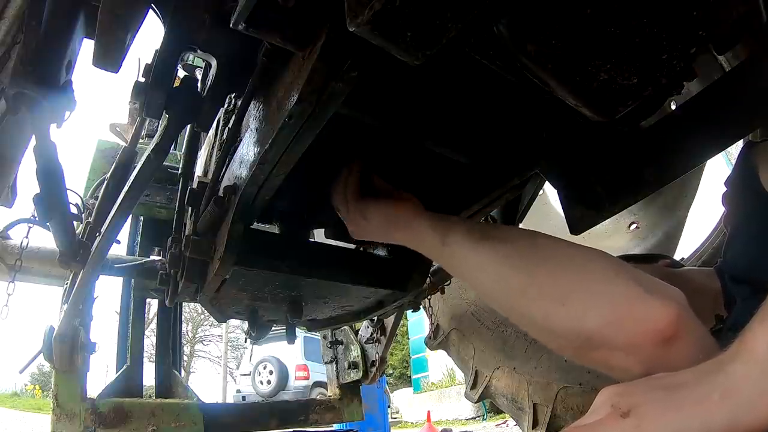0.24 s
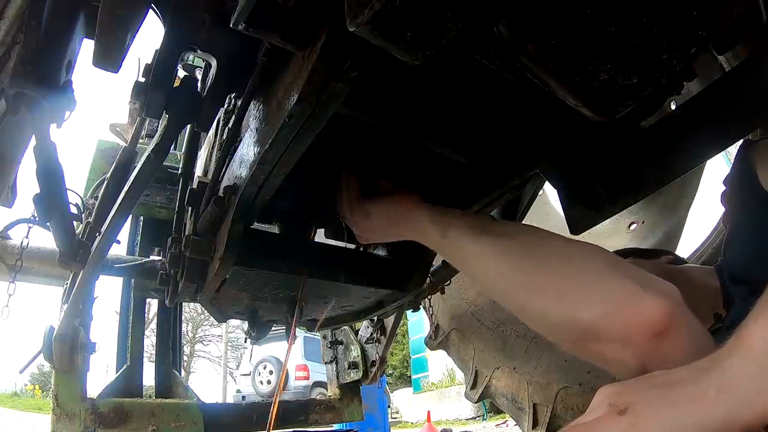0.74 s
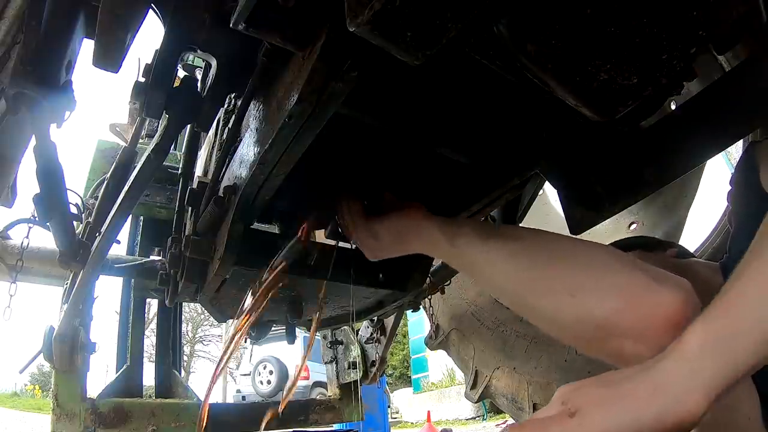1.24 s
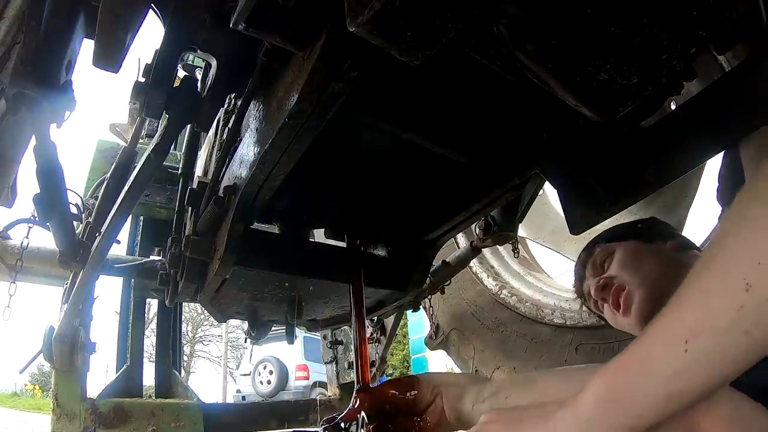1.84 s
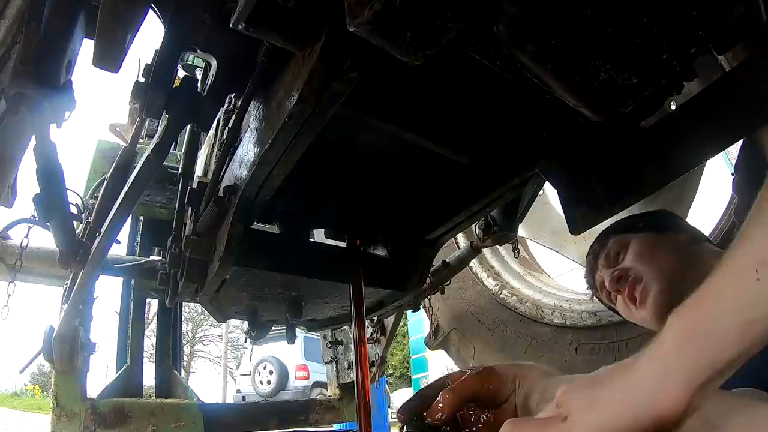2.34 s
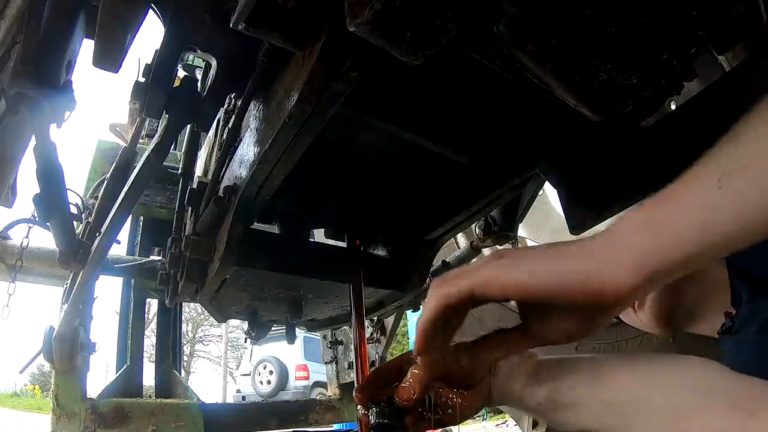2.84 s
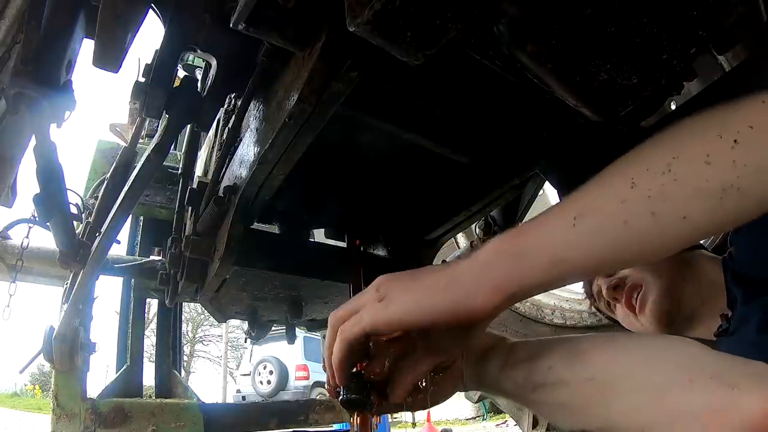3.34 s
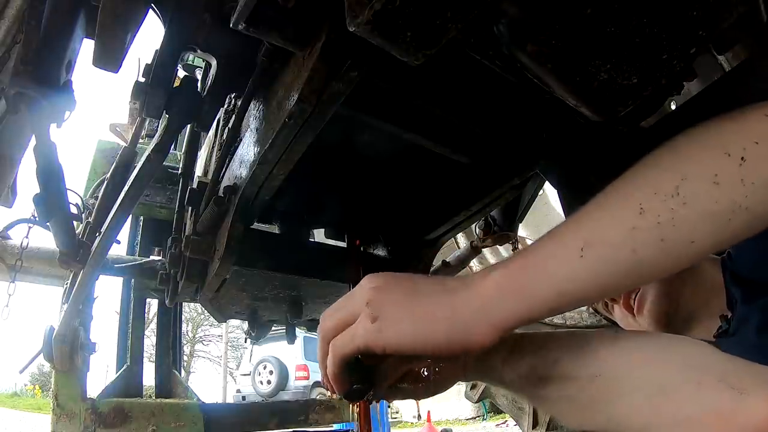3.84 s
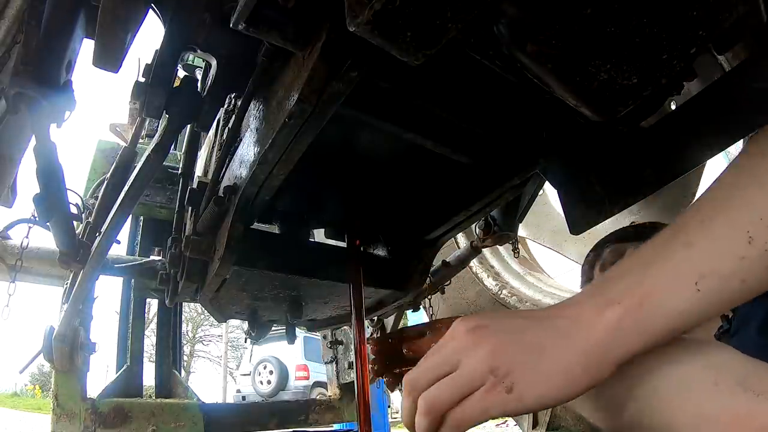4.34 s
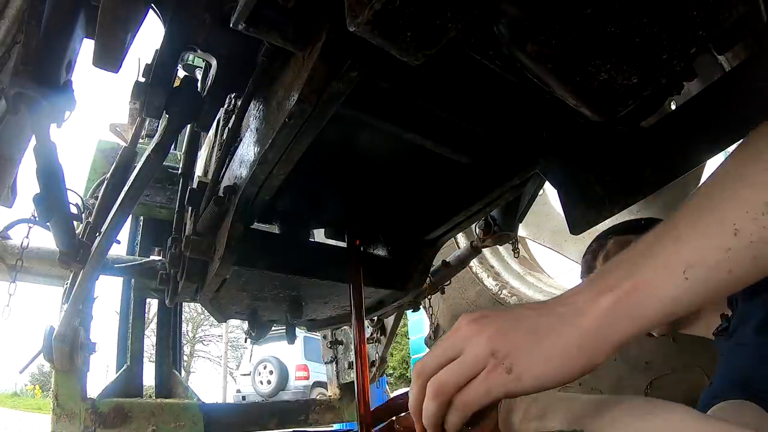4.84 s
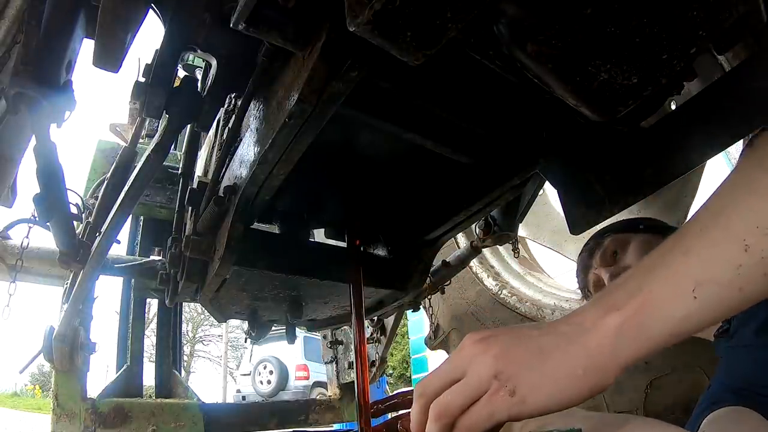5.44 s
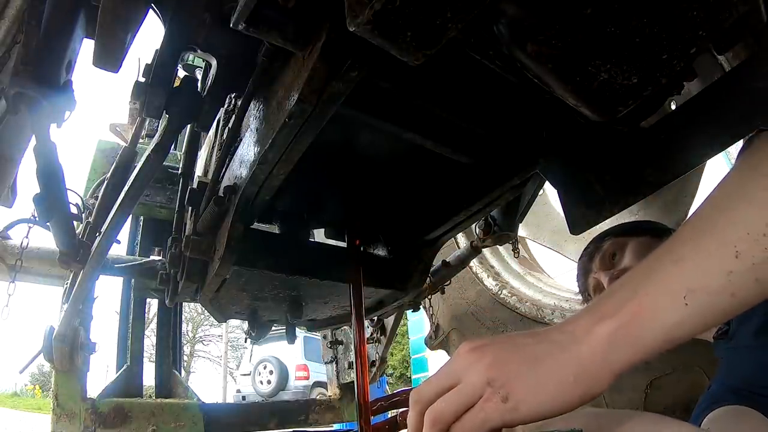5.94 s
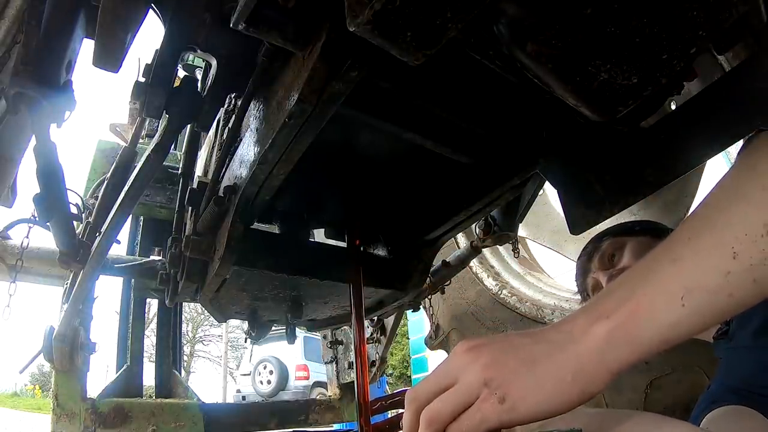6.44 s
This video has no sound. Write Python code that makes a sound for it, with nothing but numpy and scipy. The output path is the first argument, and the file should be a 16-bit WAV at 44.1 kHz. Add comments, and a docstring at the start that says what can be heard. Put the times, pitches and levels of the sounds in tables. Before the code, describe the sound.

A plug clicks loose and oil gushes into a plastic pan, splattering and gurgling, then settles to faint wet ticks.

```python
"""Draining oil into a plastic pan

Under a parked machine a drain plug clicks loose. Oil spurts past the fingers, slaps into the pan
and drums on it in surges, while trapped air gurgles. Then small wet ticks are left, over a faint rushing
that swells and fades. The pan is bumped a few times; the underbody adds a short echo in the open air."""
import sys
import numpy as np
from scipy import signal
from scipy.fft import rfft, irfft
from scipy.io import wavfile
from scipy.ndimage import uniform_filter1d

SR = 44100
rng = np.random.default_rng(int(sys.argv[2]) if len(sys.argv) > 2 else 0)


def waveform_to_disk(signal):
    """Save audio, clipped to [-1, 1], as 16-bit WAV at the path in sys.argv[1]."""
    frames = np.transpose(np.atleast_2d(signal))
    scaled = np.clip(frames, -1, 1) * 32767
    samples = np.round(scaled).astype(np.int16)
    wavfile.write(sys.argv[1], SR, samples)


N = 295029
TIME = np.arange(N) / SR  # clock for the whole scene, in seconds
HIT_TIME = np.arange(SR // 3) / SR  # clock for one short sound
TOP_HZ = 13650  # treble limit


# tone of droplets landing: pitch_hz, gain_db
SPATTER_TONE = [(500, -24), (950, 9), (1300, 8.5), (2000, 3.5), (2700, 6), (3400, -2), (4500, -10.5),
                (6500, -17), (13000, -30.5)]
# oil hits the hand and turns to mist: start_s, length_s, level_db
HAND_SPRAYS = [(0.699, 0.023, -53), (0.763, 0.014, -60), (1.278, 0.011, -51), (1.412, 0.036, -49.5),
               (1.473, 0.005, -48), (1.53, 0.12, -54.5), (1.68, 0.028, -47.5), (2.03, 0.041, -47.5),
               (2.078, 0.025, -41.5), (4.89, 0.51, -76)]
# surges of the jet (spatter is relative to the drumming, whose treble ends at the cutoff):
# start_s, crest_s, start_db, crest_db, fall_db_per_s, spatter_db, cutoff_hz
SURGES = [(1.026, 1.314, -36.5, -34.5, 197, -7, 1720), (1.329, 1.42, -33, -29, 118, -13.5, 1730),
          (1.505, 1.611, -34.5, -29.5, 147, -8, 1370), (1.812, 1.94, -37.5, -36.5, 121, -11.5, 700),
          (1.98, 2.192, -37, -32.5, 189, -4, 1680), (2.378, 2.408, -43, -36, 123, -9, 1570)]
def gush(mist_db=-24, droplets_db=-2):
    """The broken jet drums on the pan and throws off droplets and fine mist."""
    lumps = gain(wander(per_s=49))
    drumming = steady(sum(pan_bottom(drops(per_s=260, spread_db=2)) for spot in range(3)))
    drum = wetness = 0
    for *shape, spatter_db, cutoff_hz in SURGES:
        force = surge(*shape) * lumps
        drum += force * dull(drumming, cutoff_hz, order=3)
        wetness += force * gain(spatter_db)
    mist = wetness * gain(mist_db) + bursts(HAND_SPRAYS, attack_s=0.005, release_s=0.0067)
    mist *= gain(3 * wander(per_s=28))
    droplets = gain(droplets_db) * shower(SPATTER_TONE, per_s=980, spread_db=1.5)
    return drum + wetness * (droplets + spits()) + mist * spray()


def surge(start_s, crest_s, start_db, crest_db, fall_db_per_s, rise_db_per_s=480):
    """The force of one surge rises quickly, builds slowly and collapses."""
    build_db = np.interp(TIME, [start_s, crest_s], [start_db, crest_db])
    rise_db = rise_db_per_s * np.maximum(start_s - TIME, 0)
    fall_db = fall_db_per_s * np.maximum(TIME - crest_s, 0)
    return gain(build_db - rise_db - fall_db)


# tone of a dead thud on the pan: pitch_hz, gain_db
THUD_TONE = [(60, -16), (140, -21.5), (215, -12.5), (300, -2.5), (600, 3), (800, -4.5), (1050, 0.5),
             (1400, -18.5), (2200, -32), (5000, -41)]
# notes the pan's oily bottom rings with: pitch_hz, level_db, ring_s
BOTTOM_NOTES = [(284, -12, 0.47), (396, 0, 0.089), (491, 5, 0.1), (520, -10, 0.092), (639, 4.5, 0.23),
                (674, 11.5, 0.064), (854, -6.5, 0.32), (966, 7, 0.089), (970, -5, 0.023),
                (1173, -0.5, 0.19)]
def pan_bottom(force, ring_db=0):
    """Each hit gives a thud and rings the bottom, which the oil soon quiets."""
    thud = colour(force, THUD_TONE)
    ring = band(through(force, ringing(BOTTOM_NOTES)), 220, 1700)
    return unit(thud) + gain(ring_db) * unit(ring)


# blobs of oil landing (spatter is relative to the thud): start_s, peak_db, pitch_hz, spatter_db
SLAPS = [(0.687, -36, 890, -3), (0.699, -27, 632, -3.5), (0.707, -23.5, 429, -9.5),
         (0.762, -35.5, 371, -15), (0.982, -39.5, 635, -11), (1.021, -26, 708, -11), (1.063, -25, 980, -13),
         (1.091, -21.5, 665, -9.5), (1.153, -26, 684, -25), (1.245, -20.5, 680, -7),
         (1.291, -25.5, 336, -10), (1.378, -28, 666, -23), (1.474, -19.5, 970, -19), (1.512, -24, 600, -11),
         (1.562, -20, 517, -15), (1.575, -21, 990, -4), (1.593, -17, 564, -9.5), (1.606, -19, 557, -7.5),
         (1.668, -26, 663, -5), (1.770, -29.5, 586, -28), (1.824, -36, 497, -9), (1.868, -33, 563, -20),
         (1.974, -26, 697, -14), (2.015, -27, 970, -12), (2.077, -23, 1135, -0.5), (2.128, -24, 860, -11),
         (2.173, -21.5, 864, -17), (2.232, -25, 646, -1), (2.398, -27.5, 460, -11.5),
         (2.479, -36, 550, -4.5)]
def slaps(flatten_s=0.0024, sharpness=5):
    """Each blob flattens on the pan, punches a briefly ringing hollow in the pool and spatters."""
    out = np.zeros(N)
    for start_s, peak_db, pitch_hz, spatter_db in SLAPS:
        thud = pan_bottom(splash(ring_s=0.049, attack_s=flatten_s), ring_db=1.5)
        add(out, start_s, peak(thud, peak_db))
        hollow = resonate(splash(ring_s=0.073, attack_s=flatten_s), pitch_hz, sharpness)
        add(out, start_s, peak(resonate(hollow, pitch_hz, sharpness), peak_db - 3))
        spatter = colour(splash(ring_s=0.059, attack_s=flatten_s), SPATTER_TONE)
        add(out, start_s, peak(underbody(spatter), peak_db + spatter_db))
    return out


# tone of a splat: pitch_hz, gain_db
SPLAT_TONE = [(500, -1), (1500, -13.5), (2600, -3.5), (5000, -10.5), (8000, -17), (13000, -11)]
# blobs that burst: start_s, peak_db, cutoff_hz
SPLATS = [(1.219, -42, 4000), (1.3176, -35, 6000), (1.3814, -33, 3470), (1.4064, -35, 7000),
          (1.4704, -27.5, 9980), (1.6049, -24, 4500), (1.7153, -25, 5900), (1.7194, -29, 8000),
          (1.7696, -26, 6200), (1.822, -26.5, 4480), (1.8682, -28.5, 3760), (2.0325, -31, 5000),
          (2.0762, -21.5, 6900), (2.314, -33, 7500), (2.4056, -40, 5050), (2.639, -34, 4000)]
def splats():
    """A blob bursts flat with a sharp, wet crack."""
    out = np.zeros(N)
    for start_s, peak_db, cutoff_hz in SPLATS:
        burst = colour(splash(ring_s=0.027, attack_s=0.001), SPLAT_TONE)
        crack = dull(burst, cutoff_hz, order=3)
        add(out, start_s, peak(underbody(crack, early_db=1, late_db=-6.5), peak_db))
    return out


# gurgles in the pool: start_s, length_s, level_db, pitch_hz
GURGLES = [(1.021, 0.16, -42, 670), (1.313, 0.11, -39, 303), (2.12, 0.09, -31, 920),
           (2.157, 0.1, -35.5, 467), (2.385, 0.12, -48, 327)]
def gurgles(per_s=260, pitch_spread=0.12):
    """The jet drags air into the pool as clouds of bubbles, each with its own pitch."""
    out = np.zeros(N)
    for start_s, length_s, level_db, pitch_hz in GURGLES:
        cloud = np.zeros(N)
        for k, (delay, pitch) in enumerate(rng.random((int(length_s * per_s), 2))):
            bubble_hz = pitch_hz * (1 + pitch_spread * (2 * pitch - 1))
            add(cloud, start_s + (k + delay) / per_s, bubble(bubble_hz, cycles=26))
        out += gain(level_db) * cloud / np.sqrt(np.sum(cloud ** 2) / (length_s * SR))
    return out


def spits(level_db=-6, low_hz=1450, octaves=1.32, count=170):
    """Drops thrown off the jet trap tiny bubbles that spit one by one."""
    out = np.zeros(N)
    start_s, end_s = SURGES[0][0], SWELLS[0][0]
    length_s = end_s - start_s
    for when, pitch, chance in rng.random((count, 3)):
        size_db = -5 * np.log(max(chance, 0.04))  # many small, a few large
        spit = bubble(low_hz * 2 ** (octaves * pitch), cycles=10, glide=0.062)
        add(out, start_s + when * length_s, gain(size_db) * spit)
    echoed = underbody(out, early_db=-1, late_db=-9)
    return gain(level_db) * unit(echoed) * np.sqrt(length_s * SR / N)


# tone of fine mist: pitch_hz, gain_db
SPRAY_TONE = [(1500, -6.5), (4000, 4.5), (6000, -1), (8000, -7), (11000, -6.5), (13500, -17)]
def spray(flicker_db=4):
    """Fine droplets keep shifting in size, and so in brightness."""
    mist = shower(SPRAY_TONE, per_s=710, spread_db=2.5)
    edges_hz = np.geomspace(2000, TOP_HZ, 6)
    return steady(sum(band(mist, low_hz, high_hz) * gain(flicker_db * wander(per_s=26))
                      for low_hz, high_hz in zip(edges_hz, edges_hz[1:])))


# the clearest wet ticks: start_s, gain_db, pitch_hz
TICKS = [(0.761, -33, 1900), (0.823, -44, 1720), (0.892, -50, 2210), (0.926, -49, 2390),
         (2.736, -46.5, 2350), (3.015, -48.5, 2650), (3.2984, -51.5, 2670), (3.327, -49, 3400),
         (3.335, -41, 2540), (3.479, -50, 3100), (3.511, -56, 5570), (3.67, -50, 2630), (4.687, -54, 2580),
         (4.9462, -49.5, 4660), (5.022, -52.5, 3920), (5.175, -51.5, 2900), (5.215, -55.5, 4330),
         (5.279, -50.5, 3680), (5.3426, -53, 2800), (5.645, -57, 2800), (5.843, -52.5, 3050),
         (6.0658, -54.5, 2730), (6.2738, -52.5, 3740), (6.46, -55, 2530), (6.621, -56.5, 2940)]
def ticks():
    """Single drops and bursting bubbles stand out from the rest."""
    out = np.zeros(N)
    for start_s, gain_db, pitch_hz in TICKS:
        add(out, start_s, gain(gain_db) * snap(pitch_hz))
    return out


def snap(pitch_hz):
    """A film of oil snaps with a very short note and a bright edge."""
    click = underbody(splash(ring_s=0.009, attack_s=0.0008), early_db=0, late_db=-9)
    note = dull(resonate(click, pitch_hz, sharpness=2.8), cutoff_hz=4000)
    return peak(note, db=4) + peak(colour(click, SPRAY_TONE), db=-13)


# single bubbles: start_s, pitch_hz, peak_db
BUBBLES = [(1.847, 3800, -39), (2.972, 295, -49), (3.392, 3540, -54.5), (3.569, 1086, -44.5),
           (3.572, 1245, -47)]
def bubbles():
    """A few bubbles are large enough to ring out alone."""
    out = np.zeros(N)
    for start_s, pitch_hz, peak_db in BUBBLES:
        add(out, start_s, peak(underbody(bubble(pitch_hz, cycles=30, glide=0.077)), peak_db))
    return out


def bubble(pitch_hz, cycles, glide=0.074):
    """Trapped air rings and rises in pitch as it surfaces."""
    decay = fade(cycles / pitch_hz)
    rising_hz = pitch_hz * (1 + glide * (1 - decay))
    return decay * np.sin(2 * np.pi * np.cumsum(rising_hz) / SR)


# notes the pan's wall rings with: pitch_hz, level_db, ring_s
WALL_NOTES = [(141, 5, 0.27), (169.3, 3.5, 0.16), (199, 2.5, 0.1), (420, 6, 0.12), (459, 4.5, 0.14),
              (590, 8.5, 0.09), (763, -1.5, 0.11), (840, -3, 0.19), (976, 5.5, 0.11), (1121, 10.5, 0.062),
              (1417, -2, 0.2)]
# tone of a hard knock: pitch_hz, gain_db
CRACK_TONE = [(400, -3), (1500, 11.5), (3000, 0), (6000, -10), (13000, -33)]
# bumps and heavy blobs that shake the wall: start_s, peak_db, contact_ms
BUMPS = [(0.717, -45, 3.7), (0.767, -43, 0.86), (1.648, -29.5, 1.2), (1.842, -35.5, 1.2), (2.227, -43, 2.3),
         (2.358, -37.5, 1.4), (3.953, -45, 4.5), (5.904, -30.5, 0.99)]
def bumps(rattle_db=-13, crack_db=3, crack_db_per_ms=-8):
    """A long, soft push wakes only the wall's low notes; a short one wakes them all and cracks."""
    out = np.zeros(N)
    bass_cut = signal.butter(2, 110, "high", fs=SR, output="sos")
    for start_s, peak_db, contact_ms in BUMPS:
        push = HIT_TIME * np.exp(-2 * np.pi * HIT_TIME / (contact_ms / 1000))
        wall = unit(ringing(WALL_NOTES, build_cycles=0.64))
        rattle = gain(rattle_db) * unit(fading_noise(ring_s=0.064))
        thump = signal.sosfilt(bass_cut, through(wall + rattle, push))
        add(out, start_s, peak(thump, peak_db))
        crack = underbody(colour(splash(ring_s=0.04, attack_s=0.0041), CRACK_TONE))
        add(out, start_s, peak(crack, peak_db + crack_db + crack_db_per_ms * contact_ms))
    return out


# tone of a click in the plug's thread: pitch_hz, gain_db
PLUG_TONE = [(300, -1.5), (1000, 6.5), (2200, -4), (3800, -11.5), (5500, -42), (13000, -50)]
# clicks of the loose plug: start_s, peak_db
PLUG_CLICKS = [(0.216, -35), (0.508, -33.5)]
def plug():
    """The last turns of the thread click dully into the casing."""
    out = np.zeros(N)
    for start_s, peak_db in PLUG_CLICKS:
        click = colour(splash(ring_s=0.003), PLUG_TONE)
        add(out, start_s, peak(underbody(click, early_s=0.081, late_db=-4), peak_db))
    return out


# tone of a squelch: pitch_hz, gain_db
SQUELCH_TONE = [(300, 9), (1200, 7), (2800, 1), (5000, -8.5), (7500, -11), (13000, -25)]
# oily fingers on the plug: start_s, length_s, level_db
SQUELCHES = [(3.02, 0.077, -61.5), (3.31, 0.039, -61.5), (3.73, 0.1, -68), (3.943, 0.021, -54.5),
             (5.03, 0.27, -67.5), (5.8, 0.22, -64)]
def squelches(flutter_db=2):
    """Oil squeezed between the fingers crackles in uneven spurts."""
    crackle = shower(SQUELCH_TONE, per_s=950, spread_db=7.5)
    squeezes = bursts(SQUELCHES, attack_s=0.0091, release_s=0.0072)
    return crackle * squeezes * gain(flutter_db * wander(per_s=23))


# tones of the soft rushing and of the crackle: pitch_hz, gain_db
RUSH_TONE = [(100, -25.5), (300, 3), (550, 5.5), (1000, 5), (1380, 4), (1850, -13.5), (4000, -43.5)]
CRACKLE_TONE = [(900, -15), (2000, 2), (2900, -4.5), (5000, -8.5), (7500, -16), (13000, -24)]
# how the rushing swells and fades: time_s, level_db
SWELLS = [(2.55, -54.5), (2.72, -59.5), (2.88, -72.5), (3.03, -59.5), (3.22, -61.5), (3.42, -66.5),
          (3.87, -59.5), (4.02, -63.5), (4.12, -96), (4.32, -64), (4.6, -63), (4.8, -69), (4.92, -64),
          (5.15, -63), (5.52, -68), (5.8, -61.5), (6.15, -69), (6.6, -64.5)]
def rushing(crackle_db=-12, flutter_db=5.5, pops_from_s=2.7, low_pop_hz=2200, pop_count=80):
    """A faint, soft, fairly low rushing swells and fades about every 0.7 s, with crackle and tiny pops."""
    fade_in = np.interp(TIME, [2.45, 2.6], [0, 1])
    swell = gain(np.interp(TIME, *np.transpose(SWELLS)))
    rush = shower(RUSH_TONE, per_s=1500, spread_db=5.5)
    crackle = shower(CRACKLE_TONE, per_s=770, spread_db=1.5)
    pops = np.zeros(N)
    for when, pitch, size in rng.random((pop_count, 3)):
        start_s = pops_from_s + when * (TIME[-1] - pops_from_s)
        add(pops, start_s, gain(-63.5 + 8 * size) * snap(low_pop_hz * 2 ** pitch))
    pops *= np.minimum(2 * swell / np.median(swell), 1)  # quieter between swells
    crackle *= gain(crackle_db + flutter_db * wander(per_s=63))
    return fade_in * swell * (rush + crackle) + pops


def underbody(sound, early_db=2, early_s=0.059, late_db=-5, late_s=0.21):
    """The ground and the machine's underside throw back close echoes and a short tail."""
    early, late = (fading_noise(ring_s) * (HIT_TIME > 0.0006) for ring_s in (early_s, late_s))
    echoes = gain(early_db) * early / np.linalg.norm(early) + gain(late_db) * late / np.linalg.norm(late)
    echoes[0] = 1  # the direct sound
    return through(sound, echoes)


# tone of the outdoor air: pitch_hz, gain_db
AIR_TONE = [(12, -29), (20, -8), (75, -1), (102, 0), (249, -9), (451, -9.5), (517, -15.5), (592, -12),
            (889, -16.5), (1020, -15), (1800, -25), (2420, -25.5), (6090, -37), (13000, -39.5)]
def outdoors(air_db=-59, sway_db=0.84, breeze_db=-66, gust_db=3):
    """Faint far-off noise, and a light breeze that rumbles under it."""
    air = unit(colour(rng.standard_normal(N), AIR_TONE)) * gain(air_db + sway_db * wander(per_s=3.05))
    breeze_tone = [(10, -29), (35, 1), (90, 8), (200, -19.5), (1000, -51)]  # pitch_hz, gain_db
    breeze = unit(colour(rng.standard_normal(N), breeze_tone))
    return air + breeze * gain(breeze_db + gust_db * wander(per_s=15))


def splash(ring_s, attack_s=0.0001):
    """A quickly fading spatter of tiny hits; cubing the noise makes it spiky."""
    return rng.standard_normal(len(HIT_TIME)) ** 3 * fade(ring_s) * np.minimum(HIT_TIME / attack_s, 1)


def shower(tone, per_s, spread_db, spots=5):
    """Many tiny hits on several spots, each with its own echoes, blend into a steady noise."""
    return steady(sum(underbody(colour(drops(per_s / spots, spread_db), tone)) for _ in range(spots)))


def drops(per_s, spread_db):
    """Random hits, many small and a few large."""
    sizes = gain(spread_db * np.minimum(rng.exponential(size=N), 4))
    return (rng.random(N) < per_s / SR) * sizes * rng.choice([-1, 1], N)


def ringing(notes, build_cycles=0.044):
    """A body is struck at a random spot; each of its notes builds up, then fades."""
    return sum(gain(level_db) * fade(ring_s) * -np.expm1(-pitch_hz * HIT_TIME / build_cycles)
               * np.sin(2 * np.pi * (pitch_hz * HIT_TIME + rng.random()))
               for pitch_hz, level_db, ring_s in notes)


def bursts(table, attack_s, release_s):
    """A volume that rises, holds and dies away for each row."""
    return sum(gain(level_db) * np.clip((TIME - start_s) / attack_s + 1, 0, 1)
               * np.exp(-np.maximum(TIME - start_s - length_s, 0) / release_s)
               for start_s, length_s, level_db in table)


def wander(per_s):
    """A random drift, mostly between -1 and 1."""
    points = rng.standard_normal(1024)
    return np.interp(TIME * per_s, np.arange(len(points)), points)


def fade(ring_s):
    """Die away by 60 dB in ring_s seconds."""
    return np.exp(-np.log(1000) * HIT_TIME / ring_s)


def fading_noise(ring_s):
    """A puff of hiss that dies away."""
    return rng.standard_normal(len(HIT_TIME)) * fade(ring_s)


def colour(sound, tone, size=4096):
    """Make each pitch louder or softer, following a tone table."""
    pitch_hz, gain_db = np.transpose(tone)
    grid_hz = np.maximum(np.fft.rfftfreq(size, 1 / SR), 1)
    curve = gain(np.interp(np.log(grid_hz), np.log(pitch_hz), gain_db))
    # fold the filter so that it rings only after a hit, never before
    folded = irfft(np.log(curve))
    folded[1:size // 2] *= 2
    folded[size // 2 + 1:] = 0
    return through(sound, irfft(np.exp(rfft(folded))))


def resonate(sound, pitch_hz, sharpness):
    """Bring out the sound around one pitch."""
    return signal.lfilter(*signal.iirpeak(pitch_hz, sharpness, fs=SR), sound)


def dull(sound, cutoff_hz, order=2):
    """Soften the treble above the cutoff."""
    return signal.lfilter(*signal.butter(order, cutoff_hz, fs=SR), sound)


def band(sound, low_hz, high_hz):
    """Keep what lies between two pitches."""
    return signal.sosfilt(signal.butter(2, [low_hz, high_hz], "band", fs=SR, output="sos"), sound)


def through(sound, response):
    """Give every sample of a sound the same ring or echo."""
    return signal.fftconvolve(sound, response)[:len(sound)]


def steady(sound, size=3000):
    """Keep the grain of a sound but hold its average level at 1."""
    power = uniform_filter1d(uniform_filter1d(sound ** 2, size), size)
    return sound / np.sqrt(np.maximum(power, 0) + 1e-12)


def gain(db):
    """Turn decibels into a multiplier."""
    return 10 ** (np.asarray(db) / 20)


def unit(sound):
    """Scale to an average (rms) level of 1."""
    return sound / np.sqrt(np.mean(sound ** 2))


def peak(sound, db):
    """Scale so the highest point is at db."""
    return gain(db) * sound / np.abs(sound).max()


def add(out, start_s, sound):
    """Mix a sound in at its start time."""
    first = int(start_s * SR)
    out[first:first + len(sound)] += sound[:N - first]


def scene():
    """Everything as heard from under the machine, in one channel."""
    mix = plug() + gush() + slaps() + splats() + gurgles() + ticks() + bubbles()
    return (mix + bumps() + squelches() + rushing() + outdoors())[None]


def record(dry):
    """Cut off the highest treble."""
    return signal.sosfilt(signal.ellip(10, 0.2, 70, TOP_HZ, fs=SR, output="sos"), dry)


dry = scene()
out = record(dry)
waveform_to_disk(out)
```